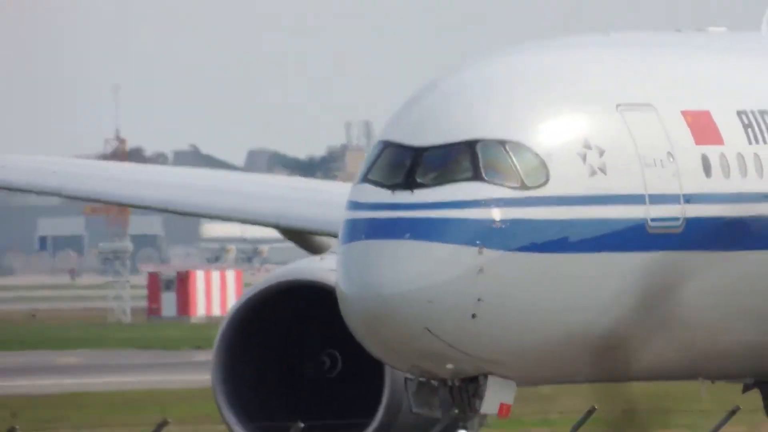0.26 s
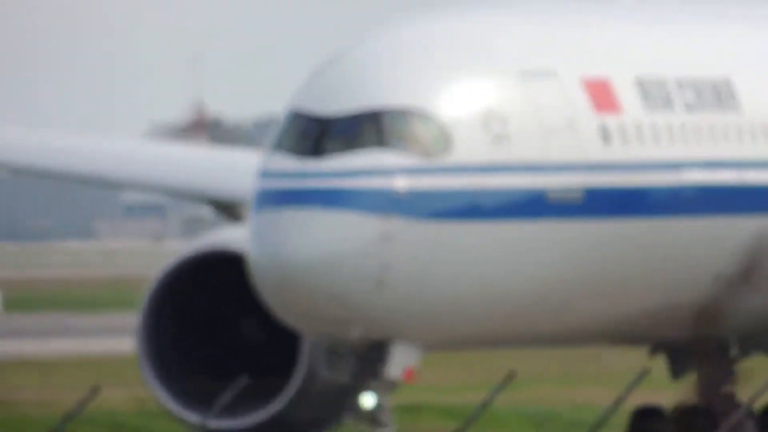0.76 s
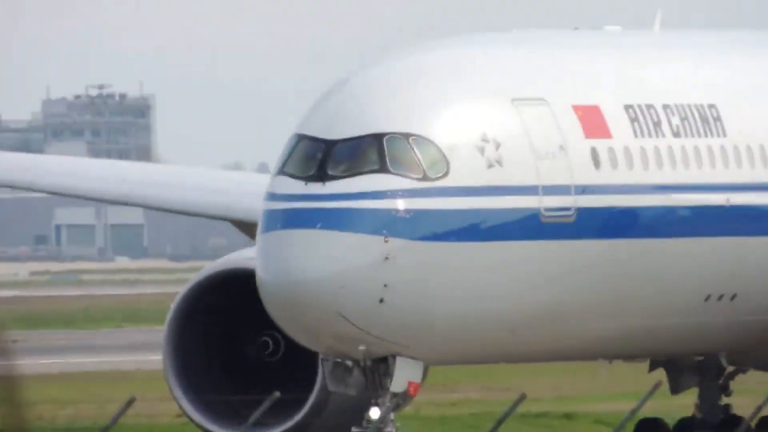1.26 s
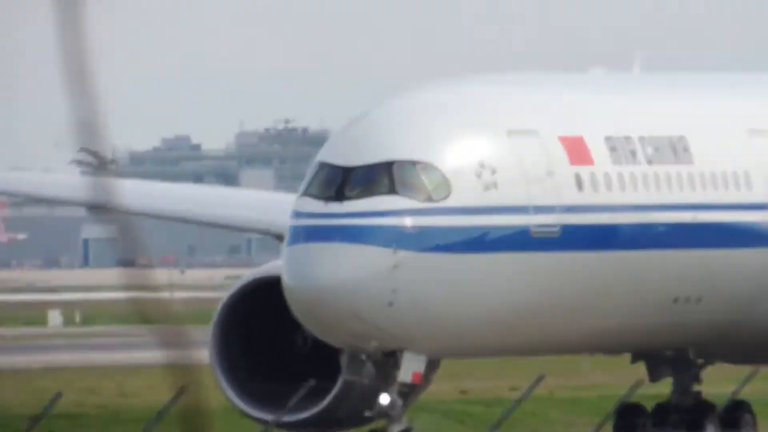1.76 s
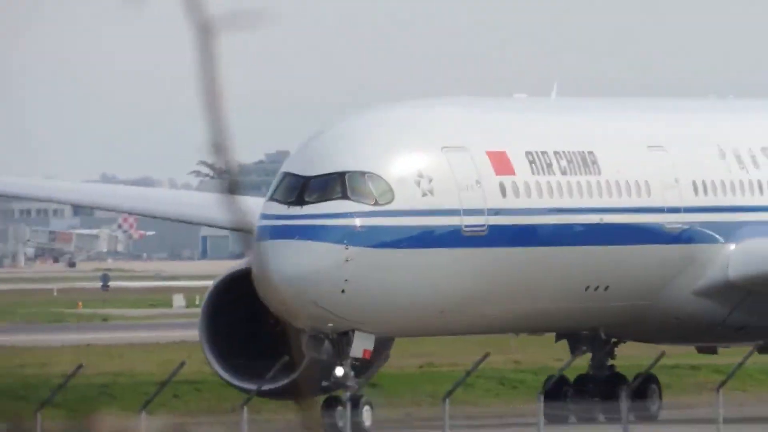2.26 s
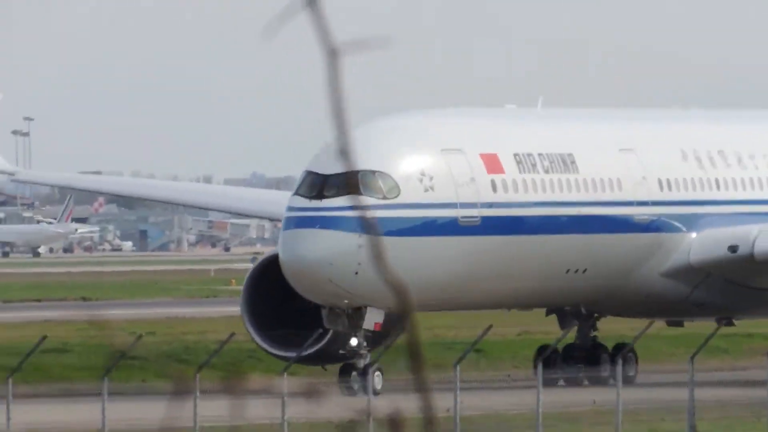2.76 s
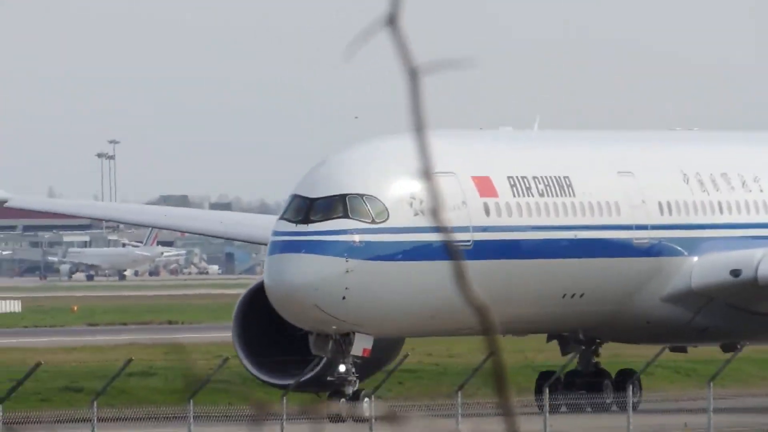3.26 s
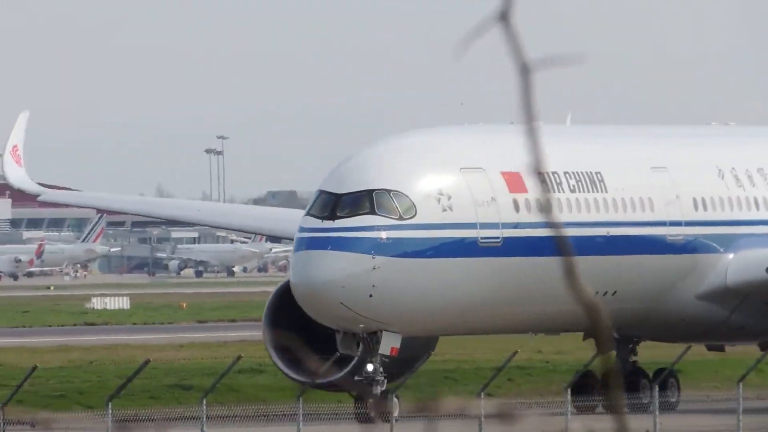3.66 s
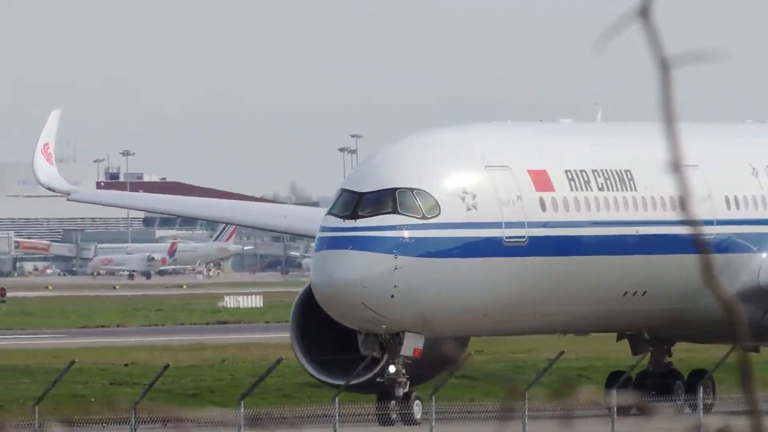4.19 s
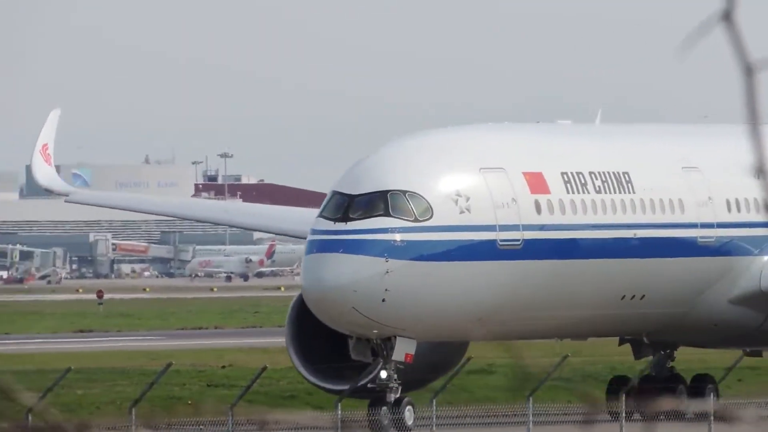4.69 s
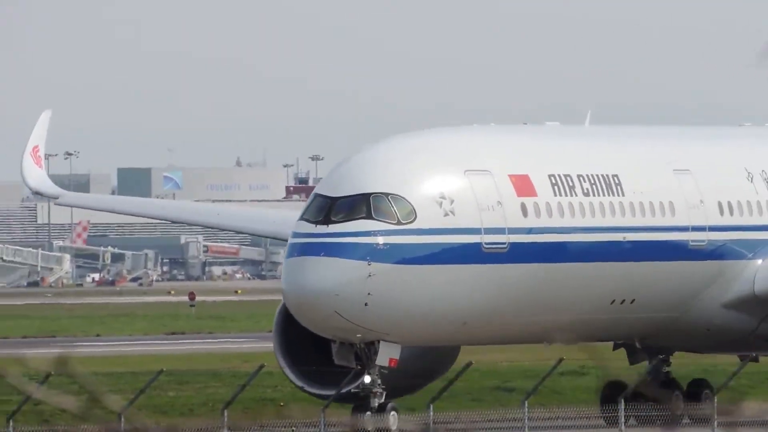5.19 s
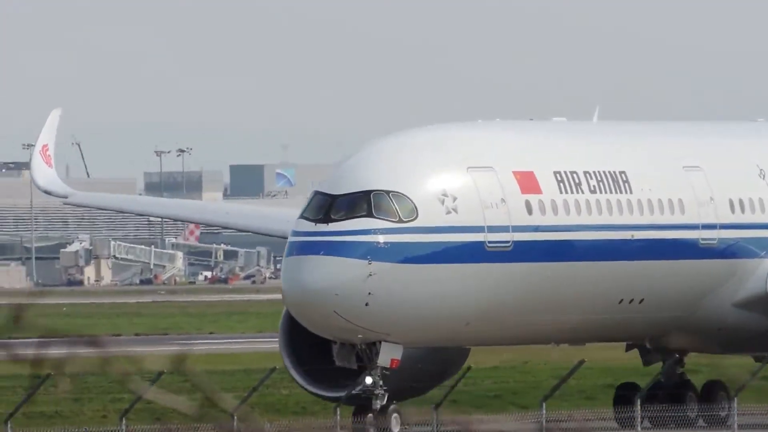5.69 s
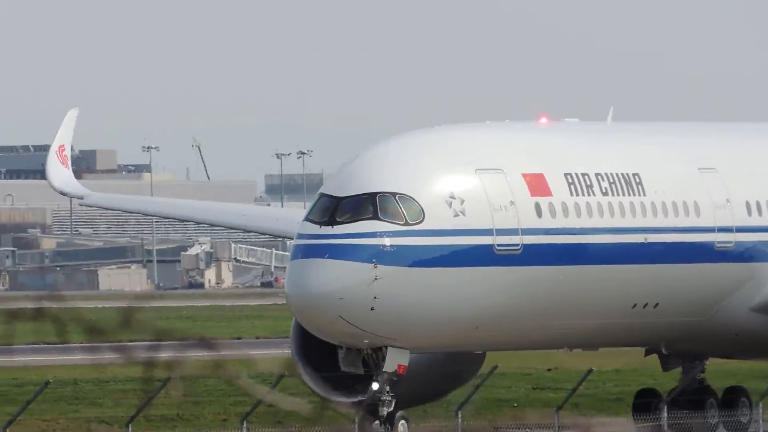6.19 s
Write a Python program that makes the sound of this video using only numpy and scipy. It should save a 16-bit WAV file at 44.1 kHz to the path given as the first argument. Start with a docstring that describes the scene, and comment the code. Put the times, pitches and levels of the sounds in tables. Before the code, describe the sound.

Distant jet engines roar and whine unevenly as an airliner taxis, beneath heavy, irregular wind thumps on the microphone and a faint zoom whirr.

```python
"""An airliner taxis past at low power: its fans roar and its compressors whine, swelling and sagging.
The engines are coloured noise plus wavering blade tones, made patchy by uneven air.
Gusts buffet two microphone ports separately: random eddy patterns are read faster in stronger wind.
A camera's zoom whirrs as noise around a wandering band and ticks as short noise bursts."""
import sys
import numpy as np
from scipy import signal
from scipy.fft import rfft, irfft
from scipy.io import wavfile
from scipy.ndimage import uniform_filter1d, map_coordinates

SR = 44100
rng = np.random.default_rng(int(sys.argv[2]) if len(sys.argv) > 2 else 0)


def output_pcm(signal):
    """Save a mono or channel-first signal as 16-bit PCM at the path in sys.argv[1].

    Samples are clipped to [-1, 1] before scaling.
    """
    pcm = np.clip(np.atleast_2d(signal).T, -1, 1) * 32767
    wavfile.write(sys.argv[1], SR, np.round(pcm).astype(np.int16))


N = 284004
TIME = np.arange(N) / SR  # seconds
BINS = np.fft.rfftfreq(N, 1 / SR)  # Hz

# tone colour of the fan roar: pitch_hz, relative_level_db (per Hz)
ROAR_COLOUR = [(20, -7), (150, -5.5), (380, -11), (500, -5), (620, -2), (790, -6), (1000, -2), (1150, -5),
               (1350, -16.5), (2000, -28), (4000, -55), (16000, -99.5)]
# tone colour of the intake hiss: pitch_hz, relative_level_db (per Hz)
HISS_COLOUR = [(20, -50), (900, -8), (1500, -2), (2500, 1.5), (3200, -4), (3500, -7), (4400, -13.5),
               (5300, -12.5), (6200, -18), (7000, -22), (8200, -30), (9500, -34.5), (14000, -35.5)]
# broad humps of blade noise in the hiss: centre_hz, width_hz, boost_db
HISS_HUMPS = [(3965, 270, 5), (4776, 245, 6), (5700, 210, 4)]
# compressor and turbine tones: pitch_hz (at IN_TUNE_S), level_db (before the hiss level is applied)
WHINE_TONES = [(2783, -28), (2993, -13), (3149, -14.5), (3203, -12.8), (3356, -21.5), (3755, -31),
               (4782, -27), (5337, -33), (5361, -24.5), (5548, -25.5), (5572, -18.3), (5758, -37),
               (5781, -21.5), (5975, -22.5), (6190, -27.5), (6410, -36), (6616, -36)]
# fan tones: pitch_hz (at IN_TUNE_S), level_db (before the roar level is applied)
FAN_TONES = [(442, -16.5), (980, -16)]
# how alike the engine noise is at the two ports: pitch_hz, likeness (0 to 1)
PORT_LIKENESS = [(60, 0.7), (600, 1), (1300, 0.96), (2800, 0.6), (6200, 0.75), (14000, 0.99)]
# engine balance between the ports: pitch_hz, left_minus_right_db
PORT_BALANCE = [(60, -1.5), (670, -3.5), (1220, -4.5), (2230, -7.5), (4060, -5.5), (6500, -7), (10000, 1),
                (14000, -1)]
# levels of the engines as they sink and swell: time_s, roar_db, hiss_db (before HISS_GAIN_DB)
ENGINE_LEVELS = [(0.0, -30.5, -42.5), (.08, -33.5, -41), (.24, -35, -44.5), (.59, -32.5, -40),
                 (1.11, -39.5, -48.5), (1.5, -36, -43.3), (2.13, -34.5, -41.3), (2.24, -42, -47.5),
                 (2.72, -39, -43), (2.89, -43.5, -53), (3.26, -46.5, -54), (3.55, -40, -49),
                 (3.8, -34, -42), (4.06, -28, -34.5), (4.2, -27.5, -35.5), (4.55, -28.5, -34.5),
                 (5.03, -28, -37.5), (5.17, -35, -40.5), (5.33, -37, -44.5), (5.5, -43, -49.7),
                 (6.1, -43.5, -47.5), (6.44, -37, -43.5)]
# a bright band that repeatedly sweeps up through the engine sound: time_s, centre_hz, boost_db
BRIGHT_SWEEP = [(0, 1600, 3), (.6, 1480, 4.5), (1.1, 1600, 2.5), (1.5, 1848, 1.5), (2.1, 2306, 1),
                (2.65, 2618, 1), (3.1, 2700, -2.5), (3.7, 1348, 2), (4.15, 1479, 6.5), (4.5, 1746, 1),
                (4.85, 2150, 3), (5.2, 2299, -2.5)]
# gusts that strike a port: start_s, hold_s, pressure_db, eddy_rate_hz (at full strength), port
GUSTS = [(0.0, .012, -14, 395.4, "right"), (0.03, .17, -19.5, 120.2, "right"),
         (0.193, 0.014, -24.5, 150, "left"), (0.299, 0.018, -24, 89.6, "right"),
         (0.534, 0.058, -25, 150, "right"), (0.681, .1, -20.5, 447.5, "left"),
         (.81, .11, -18, 400.5, "left"), (0.951, 0.25, -20.5, 349.8, "left"),
         (1.252, 0.035, -18, 280.6, "left"), (1.32, 0.038, -20, 351, "left"),
         (1.574, .02, -25, 199.7, "left"), (1.648, 0.048, -19.5, 451.3, "left"),
         (1.729, 0.046, -19, 351.3, "left"), (1.957, 0.026, -25, 110, "left"),
         (2.171, 0.011, -16.5, 201.2, "right"), (2.189, 0.058, -11, 510, "right"),
         (2.229, 0.016, -15.5, 139.4, "left"), (2.291, 0.086, -20.5, 231, "right"),
         (2.429, 0.034, -16, 348.5, "right"), (2.579, 0.023, -16, 90.2, "right"),
         (2.587, 0.048, -23.5, 80.3, "left"), (2.668, 0.011, -20.5, 389.5, "left"),
         (2.679, 0.052, -21, 221.5, "right"), (2.718, 0.14, -24, 229.7, "left"),
         (2.755, .016, -9.5, 462, "right"), (2.795, 0.0178, -14, 579.5, "right"),
         (2.829, .032, -13, 759.6, "right"), (2.885, 0.0494, -19, 410.2, "right"),
         (2.954, 0.14, -16, 420.9, "right"), (3.02, .018, -17.5, 780, "right"),
         (3.108, 0.03, -23.5, 180.5, "right"), (3.293, 0.092, -21.5, 90.2, "right"),
         (3.401, .03, -27, 238.3, "left"), (3.507, 0.033, -27.5, 258, "left"),
         (3.599, 0.059, -25.5, 75.24, "right"), (3.751, 0.056, -19, 170, "left"),
         (3.747, 0.031, -21.5, 160.1, "right"), (3.897, 0.022, -26.5, 231, "left"),
         (4.021, .16, -16.5, 169.2, "right"), (4.073, 0.051, -18.5, 115.1, "left"),
         (4.287, 0.016, -23.5, 119.3, "left"), (4.299, 0.097, -24, 110, "right"),
         (4.584, 0.034, -15.5, 189.1, "right"), (4.698, .015, -25.5, 170, "left"),
         (4.76, 0.023, -10, 249.9, "right"), (4.837, 0.0152, -13, 331.5, "right"),
         (4.839, 0.029, -23.5, 150, "left"), (5.041, 0.039, -12.5, 440.7, "right"),
         (5.093, 0.046, -6, 450.5, "right"), (5.164, 0.058, -15.5, 160.2, "left"),
         (5.227, 0.041, -14, 249.1, "right"), (5.306, 0.022, -7.5, 260.7, "right"),
         (5.345, 0.012, -6.5, 420, "right"), (5.33, .11, -18, 219.6, "left"),
         (5.365, .11, -11, 270, "right"), (5.414, 0.042, -12.5, 560.6, "right"),
         (5.487, 0.029, -14, 480.3, "right"), (5.54, 0.051, -17.5, 280.2, "right"),
         (5.559, .3, -21.5, 159.2, "left"), (5.698, 0.19, -17, 390.6, "right"),
         (5.766, 0.027, -16, 717, "right"), (5.93, .16, -21.5, 125.3, "right"),
         (5.969, .15, -24.5, 85.2, "left"), (6.116, 0.071, -16.5, 385.8, "right"),
         (6.191, .012, -18, 289.8, "left"), (6.273, .012, -16, 130, "left"),
         (6.221, .17, -16, 175.2, "right"), (6.418, 0.03, -10.5, 286, "right")]
# the light air under the gusts, before its random swell: time_s, left_db, right_db
BREEZE_LEVELS = [(0, -33, -29), (.6, -36, -34), (1.2, -31, -33), (1.85, -40, -43), (2.1, -40, -42),
                 (2.4, -44, -30), (3.1, -32, -31), (3.6, -34, -35), (4.4, -34, -27), (4.9, -36, -23),
                 (5.35, -31, -20), (5.95, -29, -24.5), (6.44, -33, -22.5)]
# single hard eddies that thump or crackle: time_s, push_db, pull_db, length_s, port
THUMPS = [(.6957, -3.5, -2, 0.00058, "left"), (0.8268, -6, -18, 0.00034, "left"),
          (0.8306, -28, -5.5, 0.00057, "left"), (.9336, -5.5, -10, 0.00044, "left"),
          (.982, -14, -18, .0004, "left"), (1.1738, -24, -5, 0.00042, "left"),
          (1.285, -7, -19, 0.00067, "left"), (1.3488, -14, -8, 0.00058, "left"),
          (1.6532, -11, -8, 0.00077, "left"), (1.9774, -27, -19, 0.0031, "left"),
          (2.793, -7, -4, .00026, "right"), (2.847, -11, -10, .0002, "right"),
          (2.855, -10, -10, 0.00019, "right"), (2.869, -15, -16, 0.0002, "right"),
          (2.904, -13, -13, 0.00029, "right"), (3.033, -14, -11, .00018, "right"),
          (5.1512, 3, -16, .0019, "left"), (5.183, -8, -6, 0.00099, "left"),
          (5.2127, -11, -7, .0019, "left"), (5.356, -9, -5, 0.00034, "right"),
          (5.368, -8, -7, 0.00026, "right"), (5.414, -11, -9, 0.00029, "right"),
          (5.452, -7, -4, .00027, "right"), (5.488, -15, -14, 0.00023, "right"),
          (5.514, -11.5, -13, .00022, "right"), (5.695, -17, -14, 0.00028, "right"),
          (5.741, -14, -12, 0.00035, "right"), (5.77, -11, -6, 0.00023, "right"),
          (5.794, -11, -8, .00024, "right")]
# tone colour of the zoom motor: pitch_hz, relative_level_db (per Hz)
ZOOM_COLOUR = [(20, -38), (1000, -14), (1400, -14), (1750, 5), (2200, 2), (2650, -30), (3000, -20.5),
               (3750, -6), (4500, -30), (6500, -12), (8000, -10.5), (9500, -22), (11500, -20), (14000, -23)]
# runs of the zoom motor: start_s, length_s, level_db
ZOOM_RUNS = [(0, .42, -55), (0.421, 0.92, -50.5), (1.327, 0.84, -45.5), (2.159, 0.68, -51)]
# the narrow, wandering band in the whirr: time_s, centre_hz
ZOOM_MESH = [(1.3, 2074), (1.55, 2195), (1.95, 2290), (2.2, 2145)]
# ticks of the zoom lever: time_s, level_db (of the noise burst, before it is halved)
ZOOM_TICKS = [(.640, -36), (2.843, -37), (3.332, -46)]

HISS_GAIN_DB = 1.51
SWEEP_WIDTH_HZ = 280
SAG_PER_S = 0.00062  # share of pitch the blade tones lose each second as the airliner rolls by
IN_TUNE_S = 4.4  # when the sagging tones pass through their listed pitch
TONE_FADE_HZ = 8  # how fast the blade tones fade in and out

GUST_RISE_S, GUST_FALL_S = 0.012, 0.028  # a gust arrives quickly and dies away more slowly
RISE_PER_HOLD = 0.1  # long gusts build more gently: extra rise time as a share of the hold
GUST_SLOWING = 0.4  # the eddy rate follows this power of the pressure
BREEZE_HZ, BREEZE_USUAL_DB = 150, -26  # the breeze has this eddy rate at this level
BREEZE_SWELL_DB = 2.5  # how far the breeze wanders
SURGE = 0.12  # strength of the fast surges in air speed

ZOOM_RAMP_S = 0.055  # time each run takes to fade in or out
MESH_DB, MESH_WIDTH_HZ = -2, 73  # the band's level against the rest of the whirr, and its half width
ZOOM_FLUTTER_DB = 1.0

CEILING = 0.92  # amplitude that the soft rounding approaches
EDGE_HZ = 14200  # upper band limit


def engines():
    """Fan roar and intake hiss carry their blade tones and flutter on the way through the air."""
    alike, balance_db = read(PORT_LIKENESS, BINS), read(PORT_BALANCE, BINS)
    humps_db = sum(db * np.exp(-((BINS - hz) / width) ** 2) for hz, width, db in HISS_HUMPS)
    roar = gain_of(3.0) * noise_pair(read(ROAR_COLOUR, BINS), alike, balance_db)
    roar += tones(FAN_TONES, waver=0.0045, fade_db=4.0)
    hiss = gain_of(3.5) * noise_pair(read(HISS_COLOUR, BINS) + humps_db, alike, balance_db)
    hiss += tones(WHINE_TONES, waver=0.0004, fade_db=3.0)
    roar_db, hiss_db = curves(ENGINE_LEVELS)
    roar_gain = gain_of(roar_db + 0.31 * drift(32))
    hiss_gain = gain_of(HISS_GAIN_DB + hiss_db + 0.5 * drift(13))
    return scintillation(roar * roar_gain + hiss * hiss_gain)


def tones(rows, waver, fade_db):
    """Blade tones sag slowly, waver with a shared shaft and fade one by one in the moving air."""
    speed = 1 - SAG_PER_S * (TIME - IN_TUNE_S) + waver * drift(6.2)
    shaft = np.cumsum(speed) / SR
    out = np.zeros((2, N))
    for hz, db in rows:
        wave = np.sin(2 * np.pi * hz * shaft + 0.35 * drift(14.0))
        tone = evened(wave * gain_of(fade_db * drift(TONE_FADE_HZ)))
        side = gain_of(np.array([[0.5], [-0.5]]) * read(PORT_BALANCE, hz))
        out += gain_of(db) * tone * side / side.mean()
    return out


def scintillation(x, patchy_db=1.6, size=1024):
    """Uneven air lifts and sinks patches of the spectrum, and one bright band sweeps upward."""
    hz, t, spectrum = signal.stft(x, SR, nperseg=size)
    field = rng.standard_normal(spectrum.shape[1:])
    # averaging over pitch and time turns loose noise into smooth patches a few hundred Hz wide
    for _ in range(2):
        field = uniform_filter1d(field, size=11, axis=0)
        field = uniform_filter1d(field, size=22, axis=1)
    centre_hz, boost_db = [np.interp(t, TIME, curve) for curve in curves(BRIGHT_SWEEP)]
    sweep_db = boost_db * np.exp(-((hz[:, None] - centre_hz) / SWEEP_WIDTH_HZ) ** 2)
    shaped = spectrum * gain_of(patchy_db * evened(field) + sweep_db)
    return signal.istft(shaped, nperseg=size)[1][:, :N]


def wind(rumble_db=-33, rumble_hz=70, flutter_db=2.5):
    """The two ports feel unrelated eddies, over a deep, fitful rumble of the breeze."""
    left = buffet("left", lumpy_db=2.5, steep=3.87) + thumps("left")
    right = buffet("right", lumpy_db=2.0, steep=3.45) + thumps("right")
    deep = BINS / np.hypot(BINS, 22) / (1 + (BINS / rumble_hz) ** 2) ** 0.75
    rumble = irfft(rfft(rng.standard_normal((2, N))) * deep, N)
    flutter = gain_of(flutter_db * np.array([drift(11), drift(9)]))
    return np.array([left, right]) + gain_of(rumble_db) * evened(rumble * flutter)


def buffet(port, lumpy_db, steep, largest=0.66, surge_loudness=0.62):
    """A frozen pattern of eddies blows past a port: faster air is both louder and brighter."""
    strength, hz = airflow(port)
    # the air surges many times a second, so the buffeting comes in bright spurts
    spurt = np.exp(SURGE * drift(70.6) - SURGE ** 2)
    place = np.cumsum(hz * spurt) / SR  # in eddies
    pattern_hz = 800  # eddy rate at which the pattern is drawn
    # energy falls off steeply in small eddies, and gently in those too large for the port
    scale = 1j * BINS / pattern_hz
    eddy_shape = scale / (scale + largest) / (1 + scale) ** steep
    pattern = irfft(rfft(rng.standard_normal(N)) * eddy_shape, N)
    # even strength over stretches of about nine eddies, then clumps a few eddies long
    pattern /= np.sqrt(uniform_filter1d(pattern ** 2, size=500, mode="wrap"))
    pattern = evened(pattern * gain_of(lumpy_db * drift(250)))
    passing = map_coordinates(pattern, [place * SR / pattern_hz], order=3, mode="wrap")
    return strength * spurt ** surge_loudness * passing


def airflow(port):
    """Pressure and eddy rate at one port: each gust rises, holds and falls over a wandering breeze."""
    left_db, right_db = curves(BREEZE_LEVELS)
    breeze_db = left_db if port == "left" else right_db
    power = gain_of(breeze_db + BREEZE_SWELL_DB * drift(7.97)) ** 2
    breeze_hz = BREEZE_HZ * (np.sqrt(power) / gain_of(BREEZE_USUAL_DB)) ** GUST_SLOWING
    # the stronger a flow is, the more it counts in the shared eddy rate
    weighted_hz = power * breeze_hz
    for start, hold, db, hz, side in GUSTS:
        if side == port:
            rise = np.minimum(TIME - start, 0) / (GUST_RISE_S + RISE_PER_HOLD * hold)
            fall = np.maximum(TIME - start - hold, 0) / GUST_FALL_S
            shape = np.exp(-rise ** 2 - fall)
            gust = (gain_of(db) * shape) ** 2
            power = power + gust
            weighted_hz = weighted_hz + gust * hz * shape ** GUST_SLOWING
    return np.sqrt(power), weighted_hz / power


def thumps(port):
    """A compact eddy pushes, then pulls, on the diaphragm; the smallest ones crackle."""
    out = np.zeros(N)
    for s, push_db, pull_db, length, side in THUMPS:
        if side == port:
            u = (TIME - s) / length
            out += gain_of(push_db) * np.exp(-(u + 1) ** 2)
            out -= gain_of(pull_db) * np.exp(-(u - 1) ** 2)
    return out


def zoom(tick_decay=0.0021):
    """The lens motor whirrs through the camera body, and its lever ticks."""
    drive = np.zeros(N)
    for start, length, db in ZOOM_RUNS:
        end = start + length
        corners = [start, start + ZOOM_RAMP_S, end, end + ZOOM_RAMP_S]
        drive += gain_of(db) * np.interp(TIME, corners, [0, 1, 1, 0])
    # slow noise on two carriers a quarter turn apart makes a narrow band of noise
    turn = 2 * np.pi * np.cumsum(curves(ZOOM_MESH)[0]) / SR
    mesh = drift(MESH_WIDTH_HZ) * np.cos(turn) + drift(MESH_WIDTH_HZ) * np.sin(turn)
    whirr = noise_pair(read(ZOOM_COLOUR, BINS), 0.82, 0) + gain_of(MESH_DB) * mesh
    whirr = whirr * drive * gain_of(ZOOM_FLUTTER_DB * drift(25))
    ticks, t = np.zeros(N), TIME[:SR // 50]
    for s, db in ZOOM_TICKS:
        burst = rng.standard_normal(len(t)) * np.exp(-t / tick_decay) / 2
        add(ticks, s, gain_of(db) * burst)
    return whirr + ticks


def noise_pair(colour_db, alike, balance_db):
    """Coloured noise at both ports, partly shared; the average of the two has an rms of one."""
    a, b = rfft(rng.standard_normal((2, N)))
    alike = np.clip(alike, 0, 1)
    left = a * gain_of(balance_db / 2)
    right = (alike * a + np.sqrt(1 - alike ** 2) * b) * gain_of(-balance_db / 2)
    pair = irfft(np.array([left, right]) * gain_of(colour_db), N)
    return pair / np.sqrt(np.mean(pair.mean(0) ** 2))


def drift(hz):
    """Slow random motion with an rms of one, up to about hz."""
    return evened(irfft(rfft(rng.standard_normal(N)) / (1 + (BINS / hz) ** 4), N))


def evened(x):
    """Scales to an rms of one."""
    return x / np.sqrt(np.mean(x ** 2) + 1e-20)


def gain_of(db):
    """Turns decibels into amplitude."""
    return 10 ** (np.asarray(db) / 20)


def curves(rows):
    """Joins (time, value, ..) rows by straight lines, one curve for each value column."""
    s, *columns = np.transpose(rows)
    return [np.interp(TIME, s, column) for column in columns]


def read(points, hz):
    """Joins (Hz, value) rows on a log-frequency axis."""
    f, value = np.transpose(points)
    return np.interp(np.log(hz + 1), np.log(f + 1), value)


def add(mix, s, sound):
    """Mixes a sound in at a given time in seconds."""
    part = mix[max(round(s * SR), 0):][:len(sound)]
    part += sound[:len(part)]


def scene(microphone_db=-73):
    """Engines far off; wind, zoom and the microphone's own faint hiss close by."""
    microphone_hiss = gain_of(microphone_db) * rng.standard_normal((2, N))
    return engines() + wind() + zoom() + microphone_hiss


def record(dry):
    """Rounds off the strongest peaks softly, then removes the treble above the band limit."""
    rounded = dry / (1 + (dry / CEILING) ** 4) ** (1 / 4)
    lowpass = signal.firwin(511, EDGE_HZ, window=("kaiser", 9), fs=SR)
    return signal.oaconvolve(rounded, lowpass[None], "same")


dry = scene()
out = record(dry)
output_pcm(out)
```